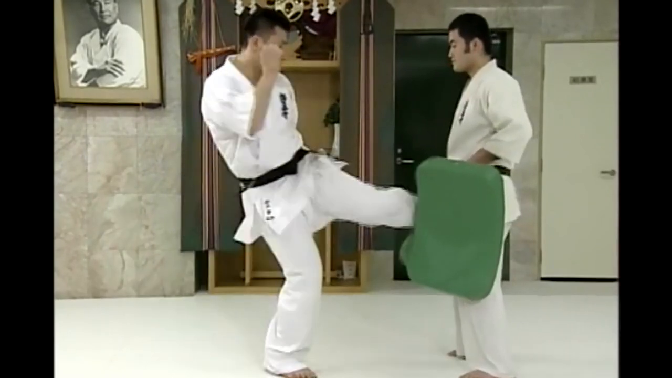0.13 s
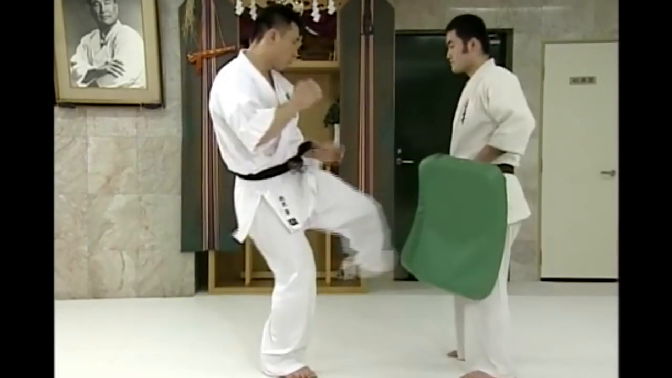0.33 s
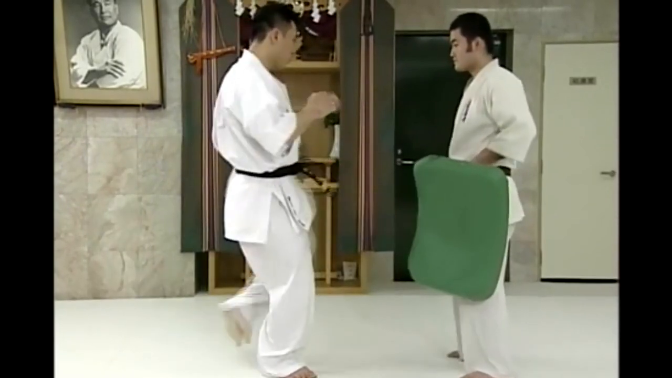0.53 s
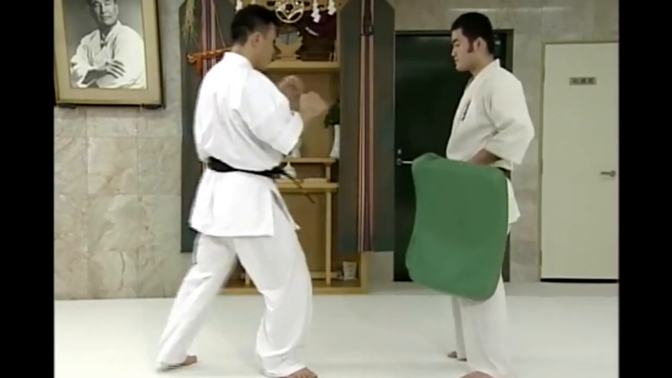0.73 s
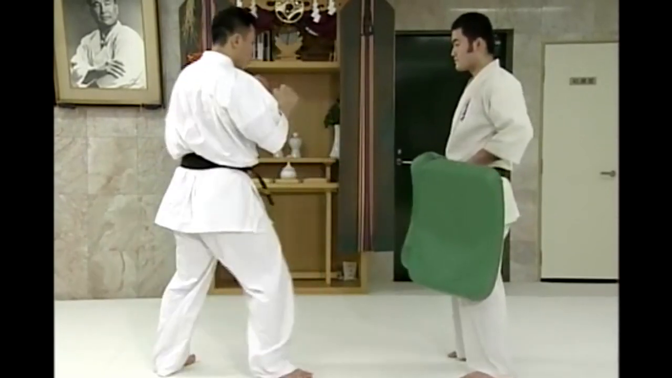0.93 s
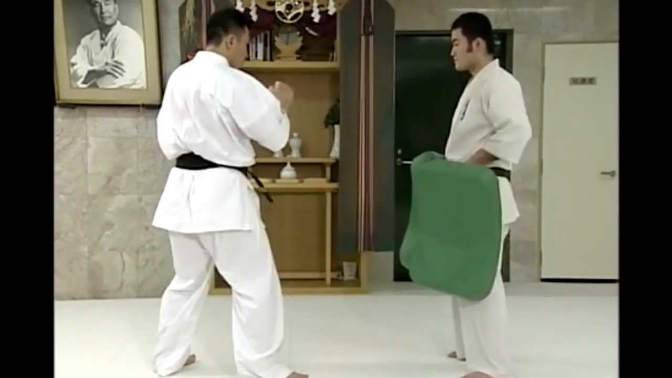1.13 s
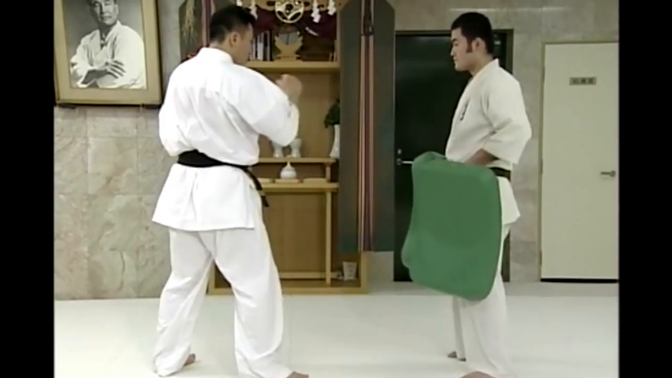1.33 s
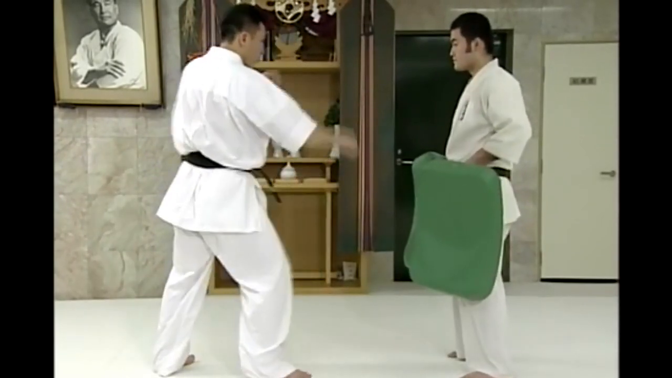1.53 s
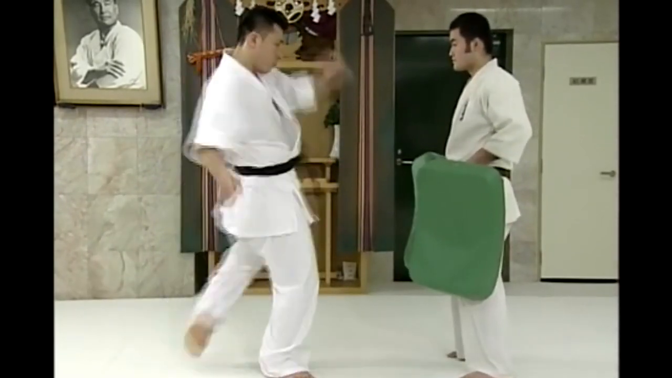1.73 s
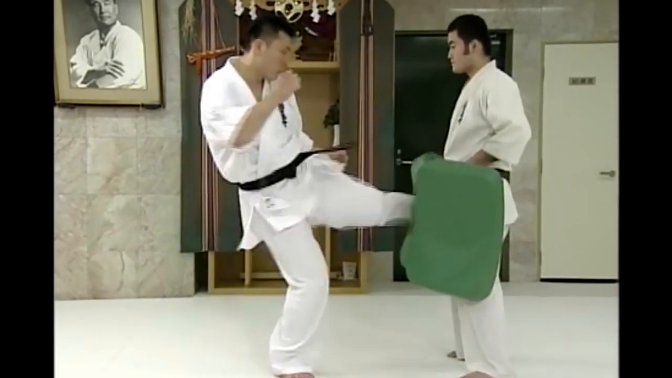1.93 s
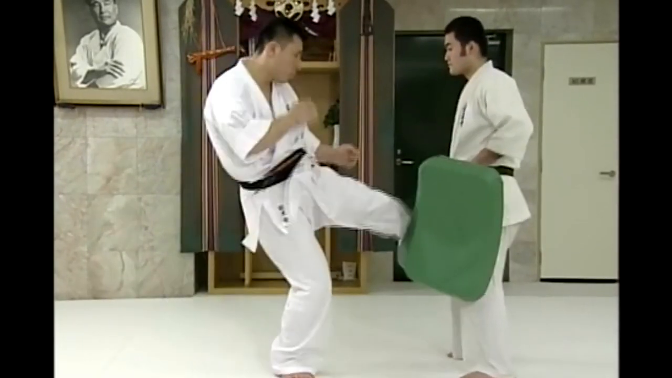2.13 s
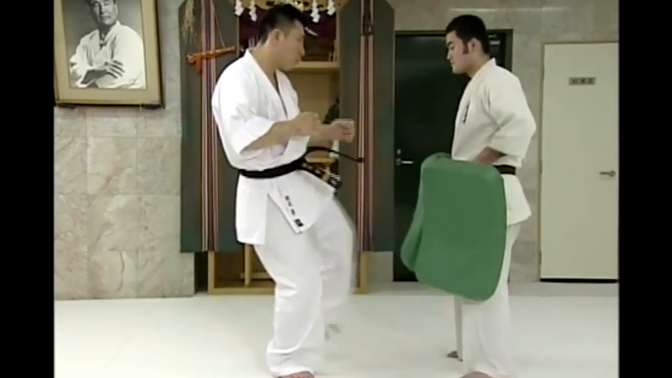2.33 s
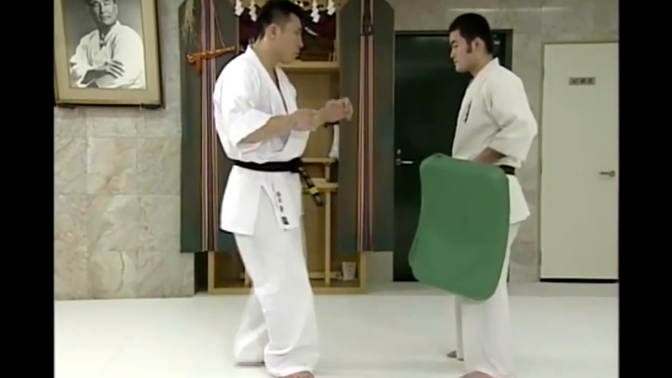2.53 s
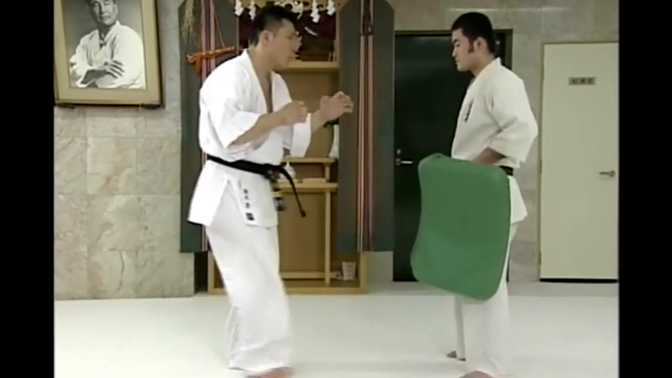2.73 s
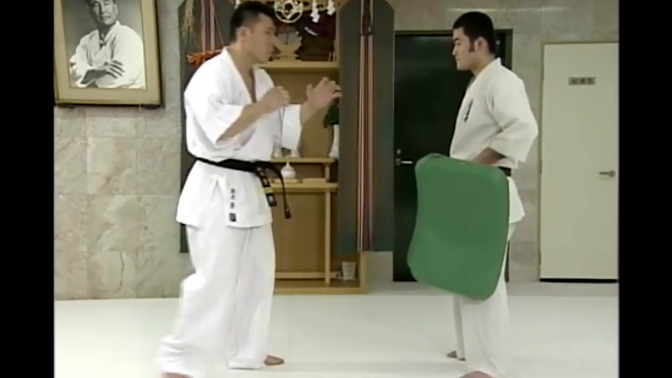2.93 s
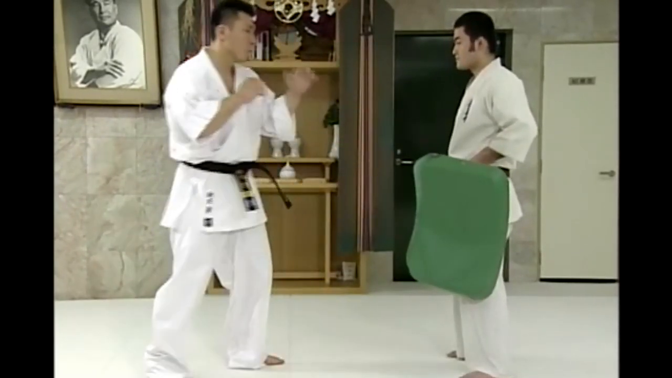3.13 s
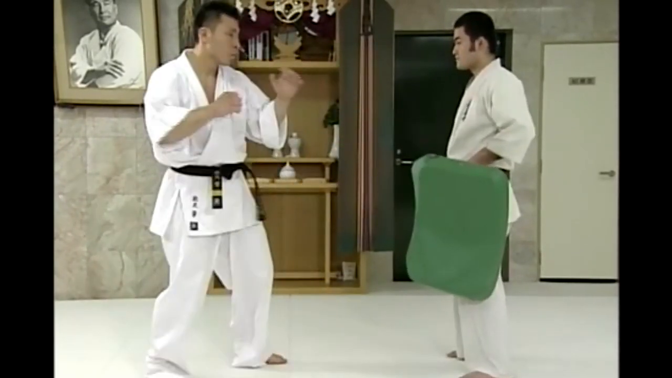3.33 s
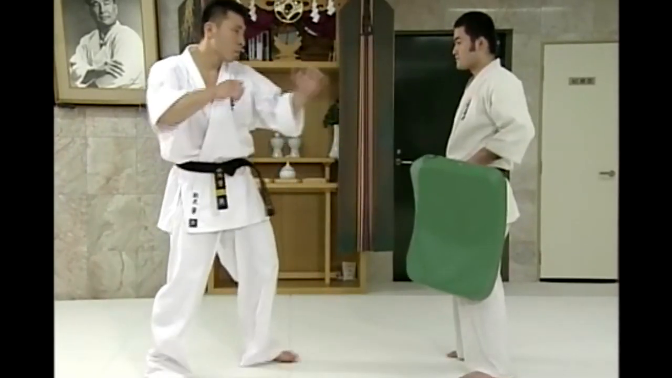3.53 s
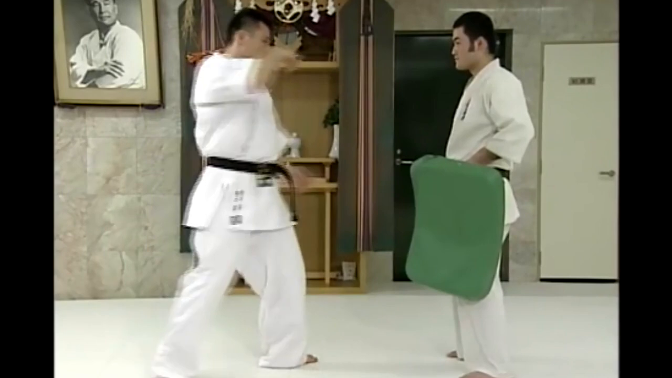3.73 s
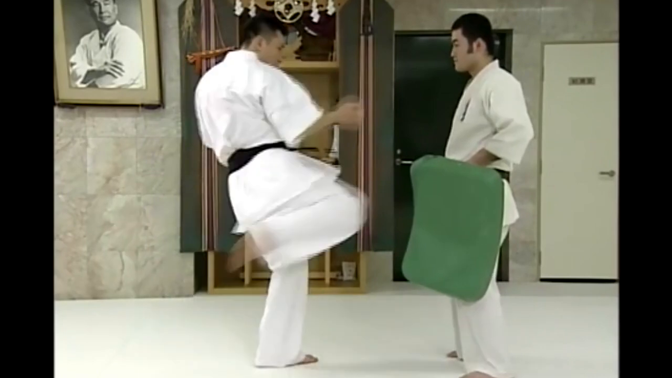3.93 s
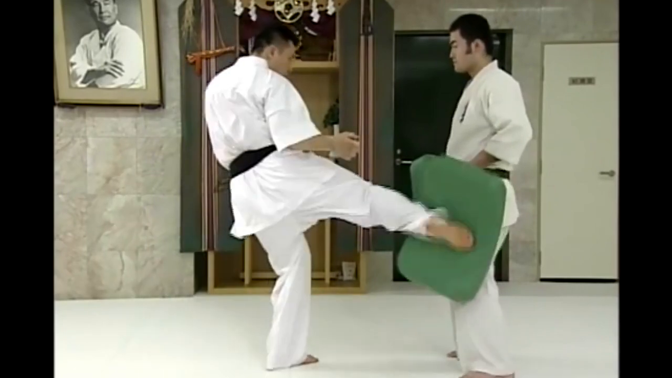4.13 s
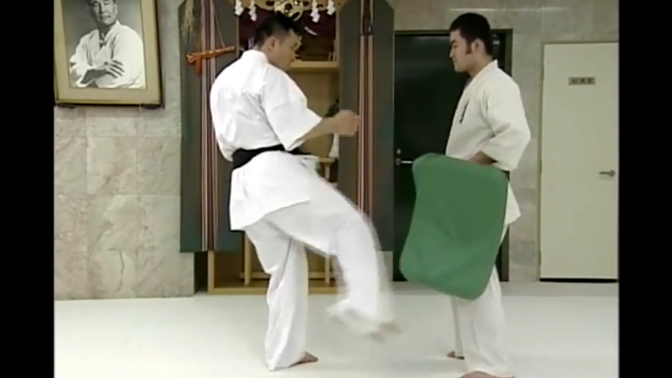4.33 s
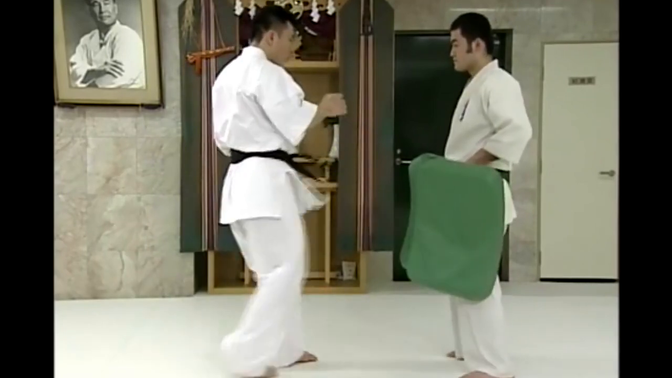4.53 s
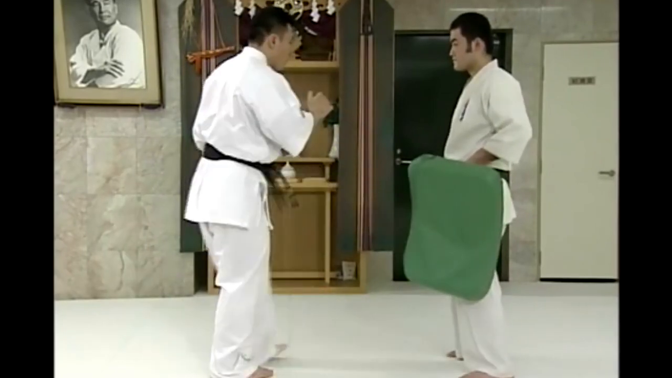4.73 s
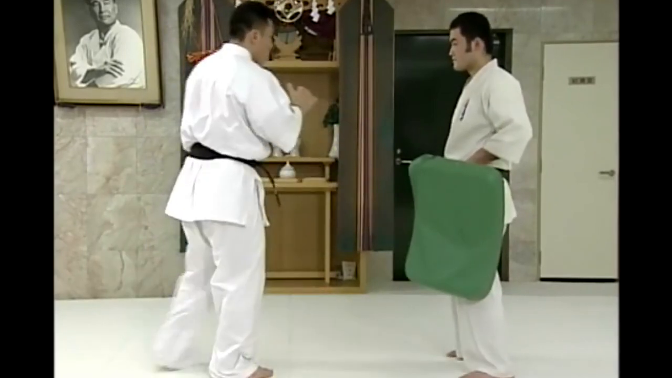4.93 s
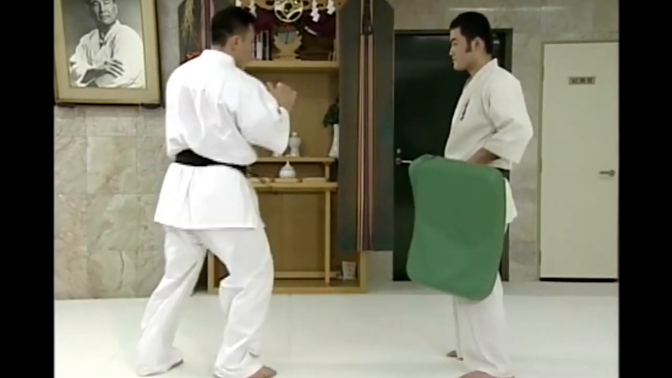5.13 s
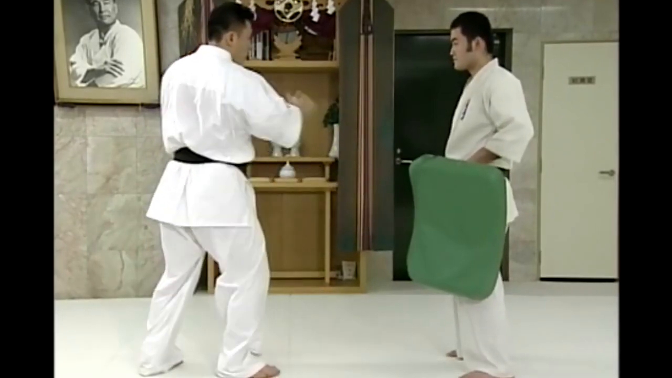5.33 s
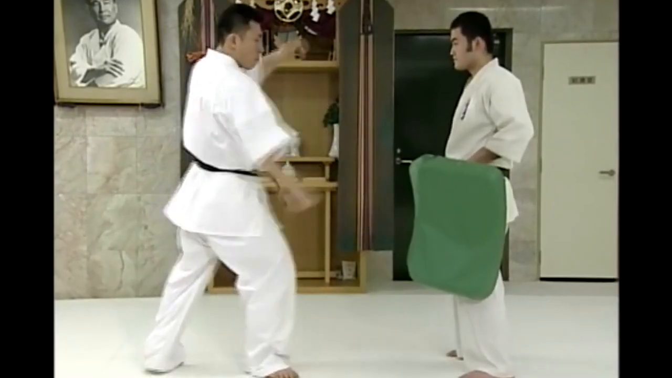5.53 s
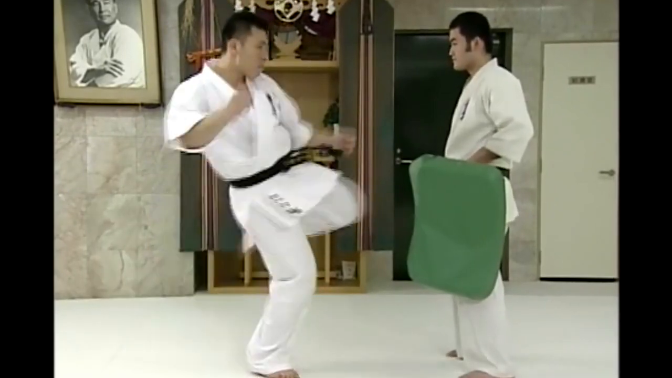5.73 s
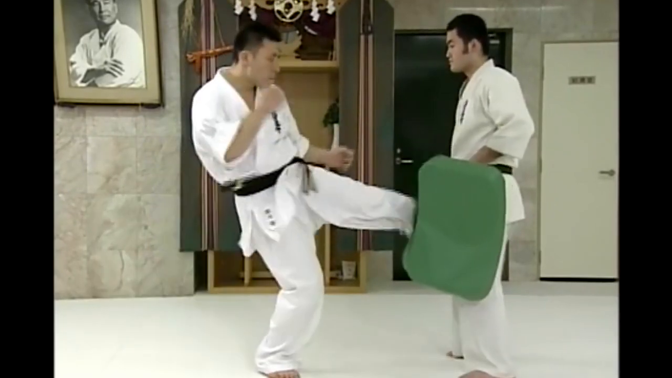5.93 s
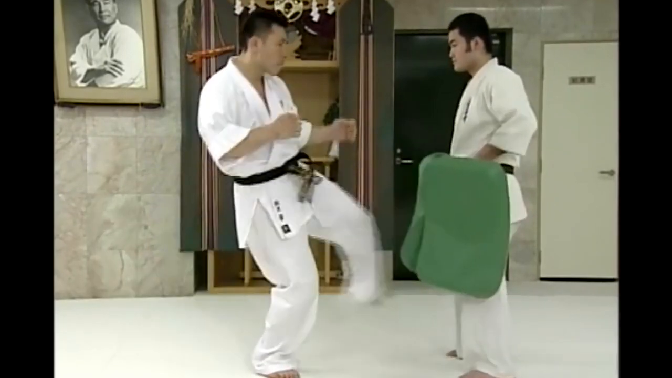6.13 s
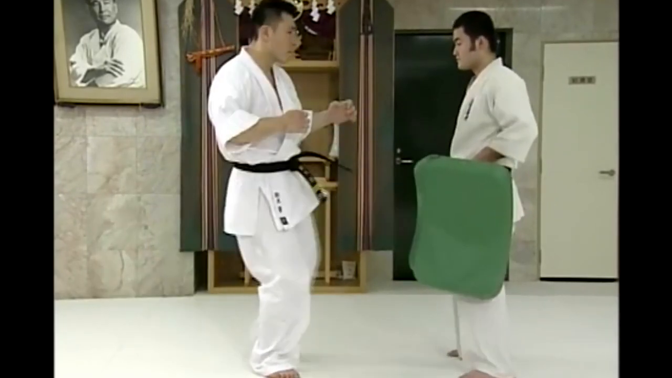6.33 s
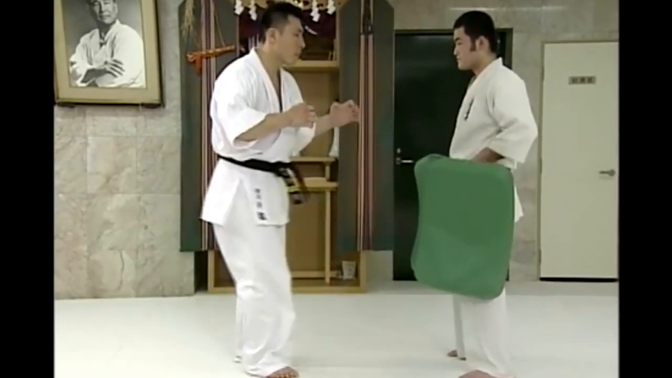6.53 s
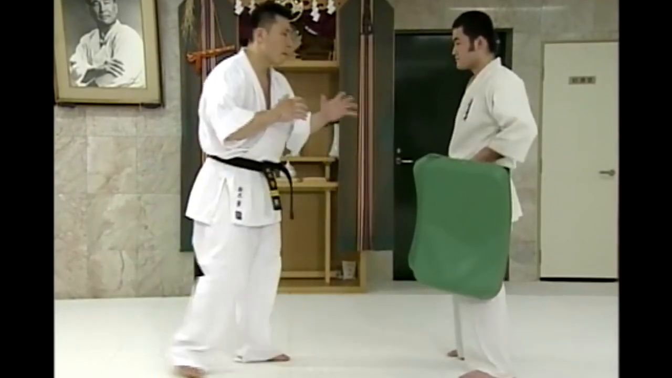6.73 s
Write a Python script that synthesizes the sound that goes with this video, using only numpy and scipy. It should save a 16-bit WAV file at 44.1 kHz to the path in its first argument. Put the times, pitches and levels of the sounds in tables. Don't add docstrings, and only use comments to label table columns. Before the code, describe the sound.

A kick hits a padded shield almost at once, then three more follow at even intervals. Loud airy thuds carry sharp, leathery slaps, with close echoes and low room resonance dying away. Quiet cloth whooshes and sole rubs lead into the later blows, the last preceded by a crisp cloth snap. Between them come weight shifts and faint vinyl creaks. A room microphone also catches low ventilation, hiss and a thin high whine.

```python
import sys
import numpy as np
from scipy import signal
from scipy.fft import rfft, irfft, next_fast_len
from scipy.io import wavfile
from scipy.ndimage import uniform_filter1d

SR = 44100
rng = np.random.default_rng(int(sys.argv[2]) if len(sys.argv) > 2 else 0)


def master(y):
    cut = np.clip(np.atleast_2d(y).T, -1, 1)
    pcm = np.round(cut * 32767)
    wavfile.write(sys.argv[1], SR, pcm.astype(np.int16))


def ratio(d):
    e = np.asarray(d, float) / 20
    return 10 ** e


N = 304290

# f/Hz, level/dB per Hz
VENT_SPECTRUM = [(15, -25.5), (25, -3.5), (80, 2.5), (148, -13.5), (184, 0), (205, -10), (248, -8.5),
                 (461, -13), (500, -8.5), (637, -12.5), (1640, -19.5), (3300, -23), (4690, -22),
                 (8970, -23.5), (15800, -23.5)]
VENT_DB, VENT_FLICKER_DB = -59, 0.4
BLADE_HZ, BLADE_DB = 500, -81
STEADY_BLADE_HZ, STEADY_BLADE_DB = 506, -72.5
WHINE_HZ, WHINE_DB = 15733, -80

# f/Hz, level/dB per Hz
CLOTH_SPECTRUM = [(410, -37), (700, -3.5), (1050, -6.5), (1500, -0.5), (2400, 0), (3300, -5), (4600, -10.5),
                  (7000, -34.5)]
# f/Hz, level/dB per Hz
SHEEN_SPECTRUM = [(2350, -31.5), (4000, 1), (6370, -4.5), (7510, -3), (8530, -5), (15000, -14.5)]
# f/Hz, level/dB per Hz
SOLE_SPECTRUM = [(71, -57.5), (120, -10), (236, -3.5), (342, -11.5), (385, -5.5), (452, -7), (1300, -18.5),
                 (1690, -36.5), (2860, -120)]
# f/Hz, level/dB per Hz
SNAP_SPECTRUM = [(530, -39), (900, -10), (1210, -11), (1820, -3), (2260, -24), (2440, -15), (12000, -30),
                 (15600, -57), (22000, -120)]
# t/s of top speed, level/dB, rise/s, fall/s, thin top level/dB
SWINGS = [
    (-.03, -67.5, .05, .07, 2),
    (1.835, -53.5, 0.046, 0.051, -2.5),
    (3.905, -59, .03, 0.05, -1),
    (3.96, -56.5, 0.05, 0.049, -10),
    (5.72, -52.5, 0.046, 0.042, -4),
    (5.81, -69, .02, 0.02, 0),
]
SHEEN_LEAD_S = 0.015
# start t/s, end t/s, level/dB, growth/dB per s
PIVOTS = [
    (-.1, .1, -59.5, -4),
    (1.627, 1.991, -59.5, 4),
    (3.67, 4.067, -62, 2),
    (5.527, 5.87, -61, 18),
]
PIVOT_ATTACK_S, PIVOT_CLOTH_DB = 0.02, -9
# t/s, length/s, soles level/dB, cloth level/dB
WEIGHT_SHIFTS = [(.75, 0.35, -64, -70), (1.15, 0.11, -75, -80), (2.7, 0.12, -67.5, -84),
                 (3.12, 0.2, -65, -72.5), (3.4, 0.16, -74, -73), (4.8, 0.28, -69.5, -75.5),
                 (5.143, 0.08, -74.5, -81), (5.43, 0.078, -70, -74), (5.676, .025, -55, -74.5),
                 (6.526, .04, -64, -77), (6.92, 0.1, -68.5, -72)]
SHIFT_SHEEN_DB = -4
# t/s, peak level/dB
SNAPS = [
    (5.7939, -39),
]
SNAP_CRACK_DB, SNAP_CRACK_T60_S = -13, 0.04

# t/s, thud level/dB, slap level/dB, depth/dB below 300 Hz, knock/dB above 700 Hz
CONTACTS = [(0.1, -32.5, -47.5, -6, -1.5), (0.107, -38, -48, 6, -3), (.111, -42, -36.5, -10, 1),
            (0.1163, -11, -27, -1, 4.5), (.130, -13.5, -19.5, 1, 0), (1.983, -37, -46.5, -4, 14),
            (1.997, -10.5, -26.5, 2.5, 1.5), (2.011, -14.5, -18.5, -19, 5), (4.079, -48, -41.5, -6, -6.5),
            (4.0841, -16.5, -15, 5.5, 6.5), (4.097, -10.5, -52.5, 1.5, -2.5), (5.857, -54, -71.5, 11.5, -3),
            (5.883, -28, -29.5, -8, 2), (5.886, -12, -36, -2.5, 1), (5.898, -20.5, -21.5, 9.5, -14)]
# t/s, level/dB, tilt/dB per octave, pad pitch f/Hz
SHOVES = [
    (0.123, -17, 3, 544),
    (2.004, -18, 3.5, 525),
    (4.094, -18.5, 7, 644),
    (5.894, -20.5, 2.5, 562),
]
KNOCK_RATIO = 1.7
# delay t/s, level/dB
ECHOES = [(0.0142, -5.5), (0.023, -14), (0.041, -3), (0.0438, -12.5), (0.065, -12), (0.067, -10)]
# f/Hz, level/dB after a thud, level/dB after a slap, t60/s
HALL_TAIL = [(60, -28, -67, 0.66), (133, -17, -57.5, 0.76), (234, 0, -34.5, 0.25), (340, -9, -34, 0.28),
             (528, -1.5, -30, 0.48), (775, -7.5, -38, 0.42), (1160, -14.5, -8, 0.36),
             (1900, -18.5, -14, 0.41), (3200, -34, -14.5, 0.43), (4530, -36.5, -11.5, 0.43),
             (6460, -47, -16, 0.44), (8550, -60, -13, 0.45), (11000, -67.5, -17, 0.39),
             (15500, -76, -28.5, .38)]
# f/Hz, level/dB after a thud, t60/s
LATE_TAIL = [(60, -29.5, 0.46), (184, -30, 1.81), (330, -38.5, 0.58), (520, -29.5, 0.9), (1030, -50, 1.2),
             (1910, -56, 3.45), (3500, -72, 2.8), (6000, -90, 1.1)]
# f/Hz, level/dB, t60/s, sign of the mode shape at the listener
HALL_MODES = [(49.45, -3, 0.81, 1), (58.1, -8.5, 0.96, 1), (65.3, -8, .95, -1), (74.0, -0.5, 1.05, 1),
              (75.9, -1.5, .92, -1), (87.2, -1, .66, -1), (95, -2, .35, -1), (103, -9, 0.48, 1),
              (113, -17, 0.71, 1), (133.7, -1, 0.18, -1), (146, -16, .55, 1), (155, -6, 0.5, -1),
              (171.2, -0.5, 0.36, 1), (187.7, -13, 0.95, -1), (191.5, -9, 0.8, 1), (209.5, 7.5, 0.17, -1),
              (217, 3.5, 0.47, 1), (237, 1, 0.45, -1), (243, -1.5, 0.64, 1), (274.7, 0, 0.36, -1)]
# t/s, f/Hz, rms level/dB, length/s
CREAKS = [(1.456, 1670, -73, .05), (2.37, 1670, -69, 0.036), (3.06, 2130, -74, 0.055),
          (3.122, 1660, -70.5, 0.062), (3.448, 1490, -71, 0.042)]
MIC_LOW_CUT_HZ = 34


def rms_one(x):
    return x / np.sqrt(np.mean(x ** 2) + 1e-20)


def at_hz(points, hz, column=1):
    points = np.array(points)
    return np.interp(np.log(hz), np.log(points[:, 0]), points[:, column])


def drift(rate):
    r = np.exp(-80 * np.pi * rate / SR)
    slow = signal.lfilter([1], [1, -2 * r, r * r], rng.standard_normal(N // 40 + 2002))
    slow = slow[2000:]
    return np.interp(np.arange(N) / 40, np.arange(len(slow)), rms_one(slow))


def ring(x, hz, t60):
    r, w = ratio(-60 / (t60 * SR)), 2 * np.pi * hz / SR
    return signal.lfilter([0, np.sin(w)], [1, -2 * r * np.cos(w), r * r], x + 1e-18)


def coloured(spectrum, patchy_db):
    size = next_fast_len(N)
    hz = np.maximum(np.arange(size // 2 + 1) * SR / size, 1)
    shaped = rfft(rng.standard_normal(size)) * ratio(at_hz(spectrum, hz))
    noise = irfft(shaped, size)[:N]
    return rms_one(noise * ratio(patchy_db * drift(12)))


def place(s, x):
    out, i = np.zeros(N), round(s * SR)
    out[i:i + len(x)] = x[:N - i]
    return out


def clicks_at(s, heights):
    out = np.zeros(N)
    out[np.round(s * SR).astype(int)] = heights
    return out


def swell(t, rise_s, fall_s):
    return np.exp(-(t / np.where(t < 0, rise_s, fall_s)) ** 2)


def background():
    t = np.arange(N) / SR
    rumble = ratio(VENT_DB - 1.5) * coloured(VENT_SPECTRUM, VENT_FLICKER_DB)
    whine = ratio(WHINE_DB + 1.5 + 2.2 * drift(12)) * np.sin(2 * np.pi * WHINE_HZ * t)
    wavering = ratio(BLADE_DB) * rms_one(ring(rng.standard_normal(N), BLADE_HZ, 0.5))
    steady = ratio(STEADY_BLADE_DB) * np.sin(2 * np.pi * STEADY_BLADE_HZ * t)
    return rumble + whine + wavering + steady


def limbs():
    t = np.arange(N) / SR
    cloth_noise = coloured(CLOTH_SPECTRUM, patchy_db=0.7)
    sheen_noise = coloured(SHEEN_SPECTRUM, patchy_db=0.7)
    sole_noise = coloured(SOLE_SPECTRUM, patchy_db=0.7)
    cloth, sheen, soles = np.zeros((3, N))
    for s, db, rise_s, fall_s, sheen_db in SWINGS:
        cloth += ratio(2 * db) * swell(t - s, rise_s, fall_s)
        sheen += ratio(2 * (db + sheen_db)) * swell(t - s + SHEEN_LEAD_S, rise_s, fall_s)
    for start, end, db, growth_db in PIVOTS:
        attack = np.clip((t - start) / PIVOT_ATTACK_S, 0, 1) ** 2
        rub = ratio(2 * (db + growth_db * (t - start))) * attack * (t < end)
        soles += rub
        cloth += ratio(2 * PIVOT_CLOTH_DB) * rub
        sheen += ratio(2 * (PIVOT_CLOTH_DB + SHIFT_SHEEN_DB)) * rub
    for s, length, soles_db, cloth_db in WEIGHT_SHIFTS:
        shift = swell(t - s, length, length)
        soles += ratio(2 * soles_db) * shift
        cloth += ratio(2 * cloth_db) * shift
        sheen += ratio(2 * (cloth_db + SHIFT_SHEEN_DB)) * shift
    moves = np.sqrt(cloth) * cloth_noise + np.sqrt(sheen) * sheen_noise + np.sqrt(soles) * sole_noise
    return moves + cloth_snaps(t, cloth_noise + sheen_noise)


def cloth_snaps(t, bright_noise):
    out, flutter_noise = np.zeros(N), coloured(SNAP_SPECTRUM, patchy_db=-3.0)
    for s, db in SNAPS:
        since = np.maximum(t - s, 0)
        flutter = flutter_noise * ratio(db - 9.5 - 60 * since / 0.44)
        crack = bright_noise * ratio(db + SNAP_CRACK_DB - 60 * since / SNAP_CRACK_T60_S)
        out += (t > s) * (flutter + crack)
    return out


def pad_thud(push, pad_hz, depth_db, knock_db):
    main = ring(push, pad_hz, 0.023)
    deep = 0.32 * ratio(depth_db) * ring(push, pad_hz * 0.419, 0.072)
    knock = 0.11 * ratio(knock_db) * ring(push, pad_hz * KNOCK_RATIO, 0.0029)
    return main + deep + knock


def contacts():
    t, out = np.arange(2048) / SR, np.zeros(N)
    soft = signal.butter(4, 1000, fs=SR, output="sos")
    bright = signal.butter(2, [1500, 9500], "band", fs=SR, output="sos")
    for s, thud_db, slap_db, depth_db, knock_db in CONTACTS:
        push_noise, skin_noise = rng.standard_normal((2, len(t)))
        pad_hz = min(SHOVES, key=lambda kick: abs(kick[0] - s))[-1]
        push = signal.sosfilt(soft, (t == 0) - 0.058 * push_noise * np.exp(-t / 0.0019))
        thud = pad_thud(push, pad_hz, depth_db, knock_db)
        crackle = skin_noise * np.exp(-t / 0.0053) * (1 - np.exp(-t / 0.0032))
        slap = signal.sosfilt(bright, crackle)
        slap = slap + 0.08 * ring(slap, 4500, 0.011)
        slap = slap + 0.29 * ring(slap, 7830, 0.0041)
        out += place(s, -ratio(thud_db + 3.0) * thud + ratio(slap_db - 1.5) * slap)
    return out + sum(ratio(db) * place(delay, out) for delay, db in ECHOES)


def dying(power, t60, rise_s):
    fall, fill = ratio(-120 / (t60 * SR)), np.exp(-1 / (rise_s * SR))
    drained = signal.lfilter([1], [1, -fall], power + 1e-18)
    return signal.lfilter([1 - fill], [1, -fill], drained)


def hall_tail():
    s, thud_db, slap_db, depth_db, knock_db = np.transpose(CONTACTS)
    thud = clicks_at(s, ratio(2 * thud_db))
    deep = clicks_at(s, ratio(2 * (thud_db + depth_db)))
    knock = clicks_at(s, ratio(2 * (thud_db + knock_db)))
    slap = clicks_at(s, ratio(2 * slap_db))
    edges = 45 * 2 ** np.arange(0, 8.6, 1 / 3)
    white, out = rng.standard_normal((2, N)), np.zeros(N)
    for k, (low, high) in enumerate(zip(edges, edges[1:])):
        hz = np.sqrt(low * high)
        third_octave = signal.butter(2, [low, high], "band", fs=SR, output="sos")
        band = rms_one(signal.sosfilt(third_octave, white[k % 2]))
        body = deep if hz < 300 else thud if hz < 700 else knock
        fed = body * ratio(2 * at_hz(HALL_TAIL, hz))
        fed = fed + slap * ratio(2 * (at_hz(HALL_TAIL, hz, column=2) + 8.0))
        early = dying(fed, at_hz(HALL_TAIL, hz, column=3), rise_s=0.0009 + 3.9 / hz)
        late_fed = body * ratio(2 * at_hz(LATE_TAIL, hz))
        late = dying(late_fed, at_hz(LATE_TAIL, hz, column=2), rise_s=0.041)
        out += ratio(-8 + 1.2 * drift(32)) * band * np.sqrt(early + late)
    return out


def nearby_surfaces(x, share):
    t = np.arange(1024) / SR
    cluster = rng.standard_normal(len(t)) * np.exp(-t / 0.006)
    return x + share * signal.fftconvolve(x, cluster / np.linalg.norm(cluster))[:N]


def boom():
    out = np.zeros(N)
    s, shove_db, tilt_db, _ = np.transpose(SHOVES)
    for hz, db, t60, sign in HALL_MODES:
        chance_db = 1.2 * rng.normal(0, 1, len(s))
        mode_db = shove_db + db + tilt_db * np.log2(hz / 120) + chance_db
        out += sign * ring(clicks_at(s, ratio(mode_db)), hz, t60)
    shove = np.hanning(2 * round(0.0025 * SR))
    return signal.fftconvolve(out, shove / shove.sum())[:N]


def creaks():
    t, noise, out = np.arange(N) / SR, rng.standard_normal(N), np.zeros(N)
    for s, hz, db, length in CREAKS:
        out += ratio(db) * rms_one(ring(noise, hz, 0.12)) * swell(t - s, length, length)
    return out


def scene():
    kicks = contacts() + nearby_surfaces(hall_tail(), share=0.3) + boom()
    return (background() + limbs() + kicks + creaks())[None]


def low_pass(x):
    return signal.sosfilt(signal.butter(12, 16600, fs=SR, output="sos"), x)


def record(dry):
    level_db = 10 * np.log10(uniform_filter1d(dry[0] ** 2, size=441) + 1e-12)
    climb_db = 26.0 * np.arange(N) / SR
    wanted_db = 0.075 * np.maximum(level_db + 31.5, 0)
    duck_db = np.maximum.accumulate(wanted_db + climb_db) - climb_db
    r = np.exp(-1 / (0.008 * SR))
    ducked = dry * ratio(-signal.lfilter([1 - r], [1, -r], duck_db))
    rounded = 0.74 * np.tanh(ducked / 0.71)
    top_cut = signal.ellip(12, 0.5, 60, 15830, fs=SR, output="sos")
    low_cut = signal.butter(2, MIC_LOW_CUT_HZ, "high", fs=SR, output="sos")
    return low_pass(signal.sosfilt(np.vstack([top_cut, low_cut]), rounded))


dry = scene()
out = record(dry)
master(out)
```